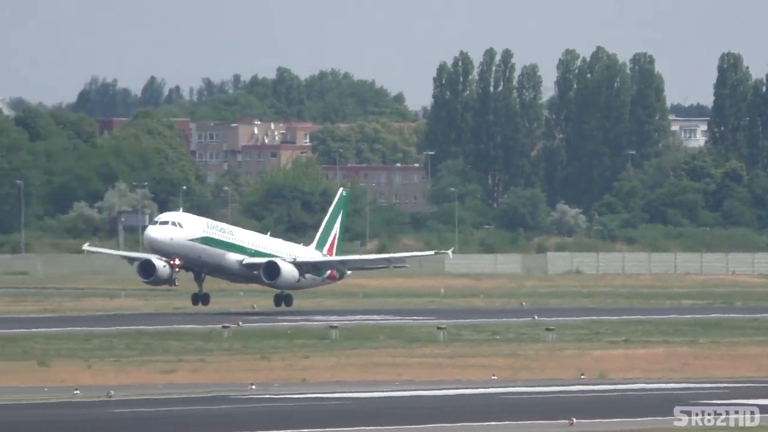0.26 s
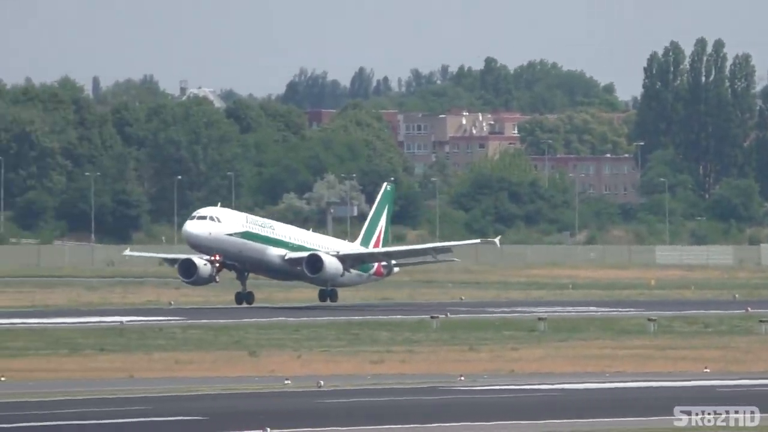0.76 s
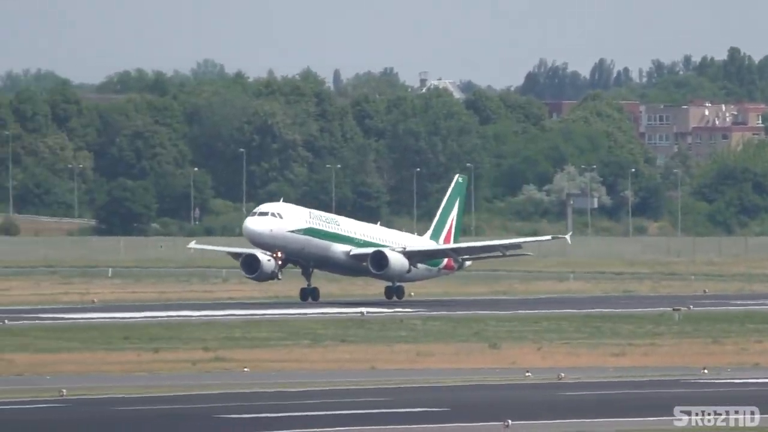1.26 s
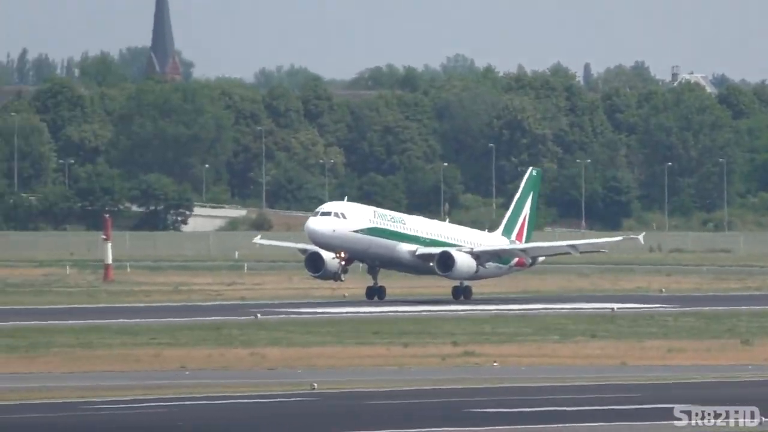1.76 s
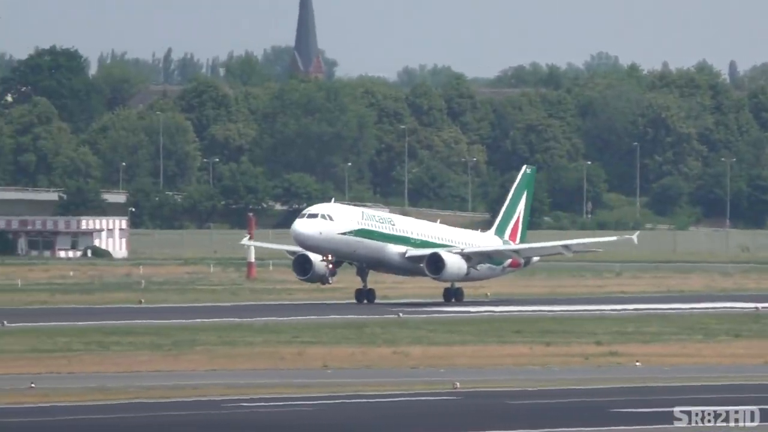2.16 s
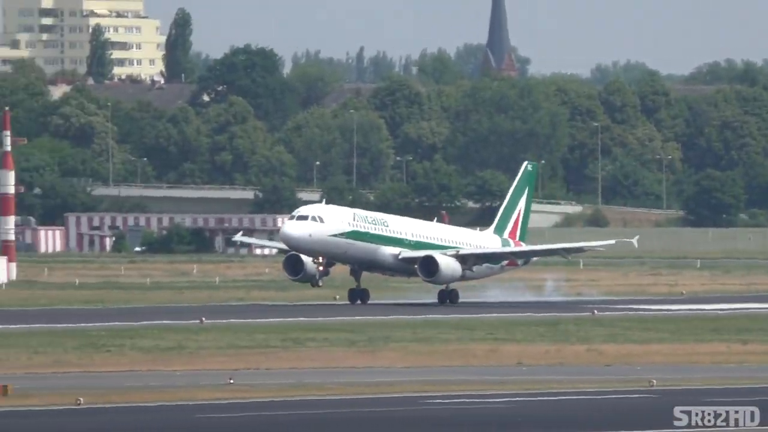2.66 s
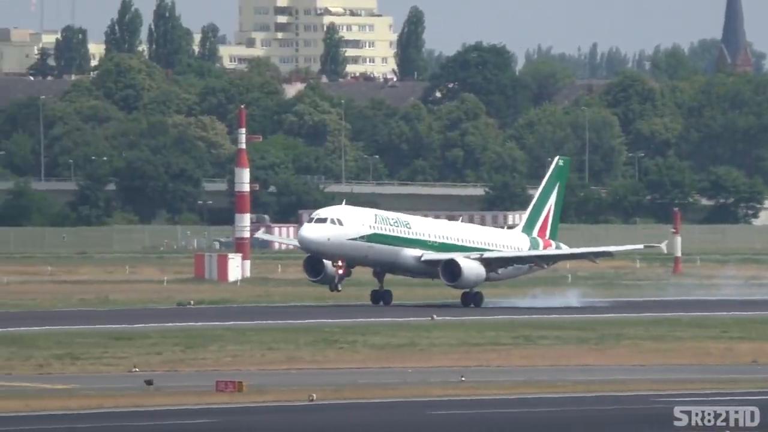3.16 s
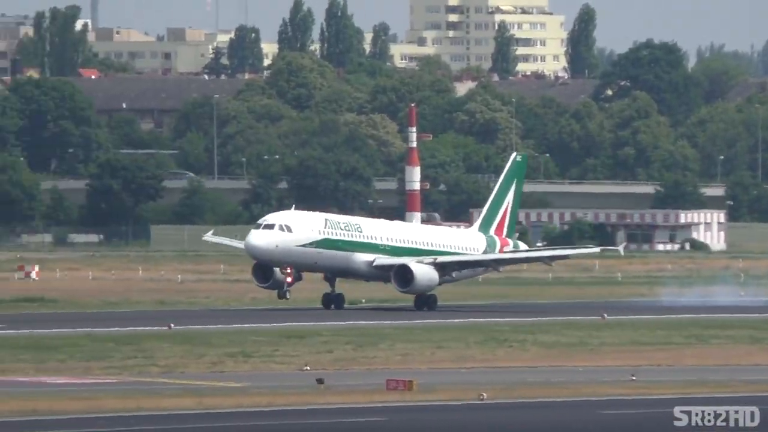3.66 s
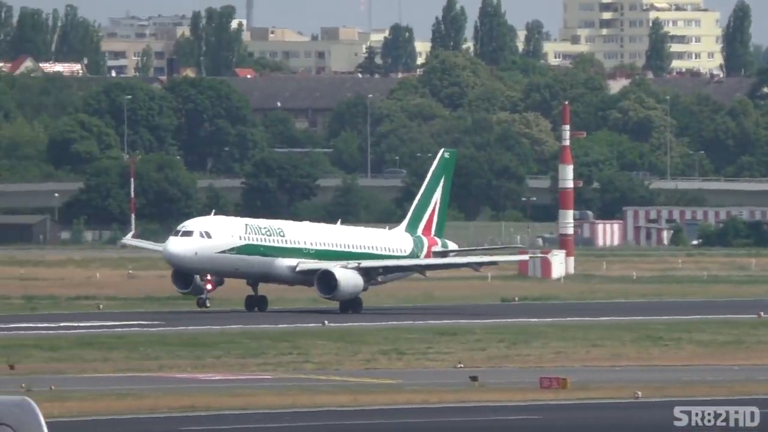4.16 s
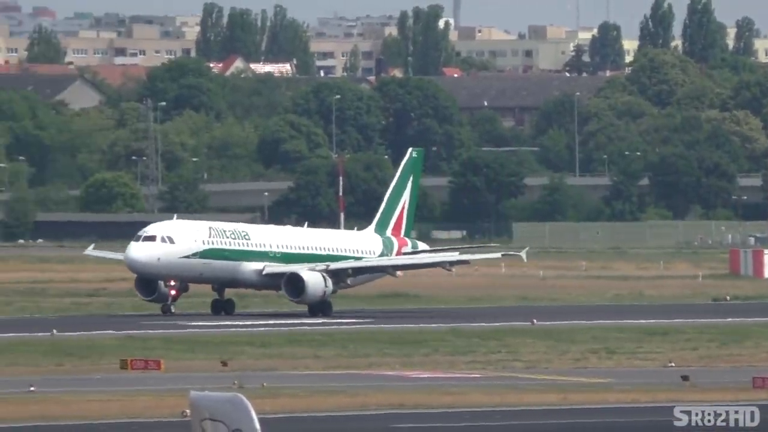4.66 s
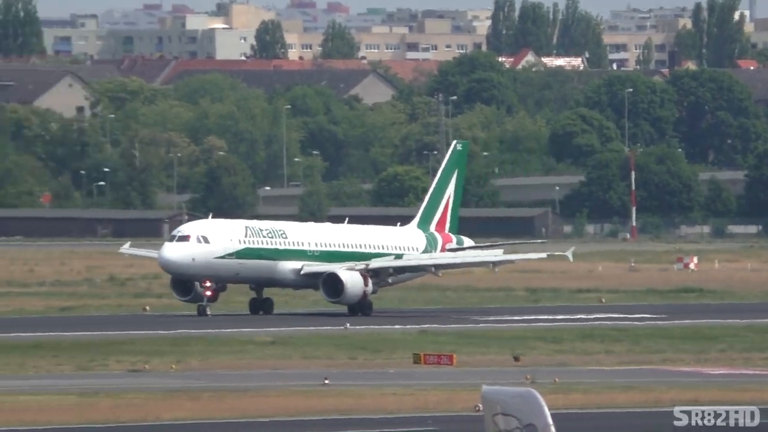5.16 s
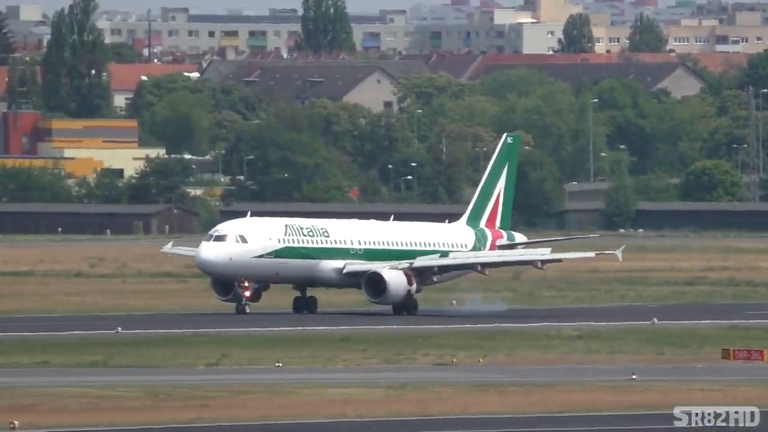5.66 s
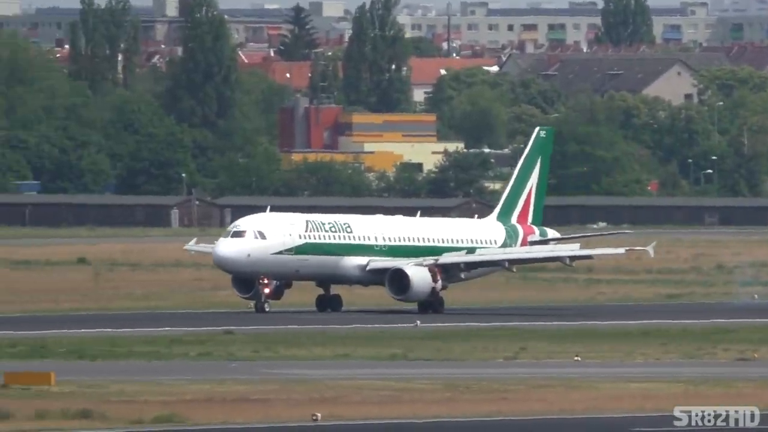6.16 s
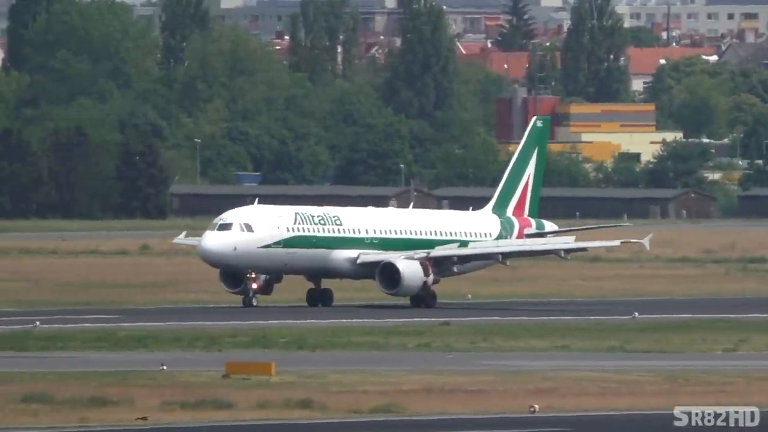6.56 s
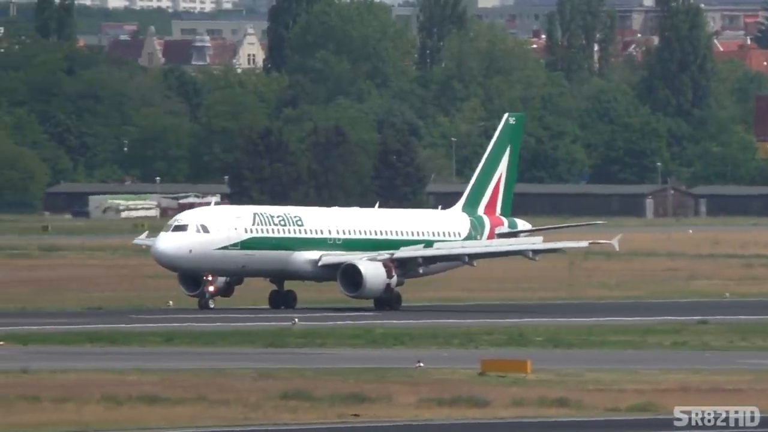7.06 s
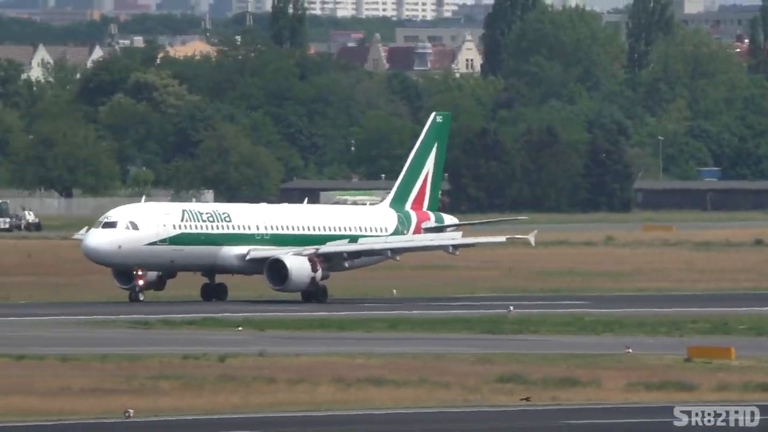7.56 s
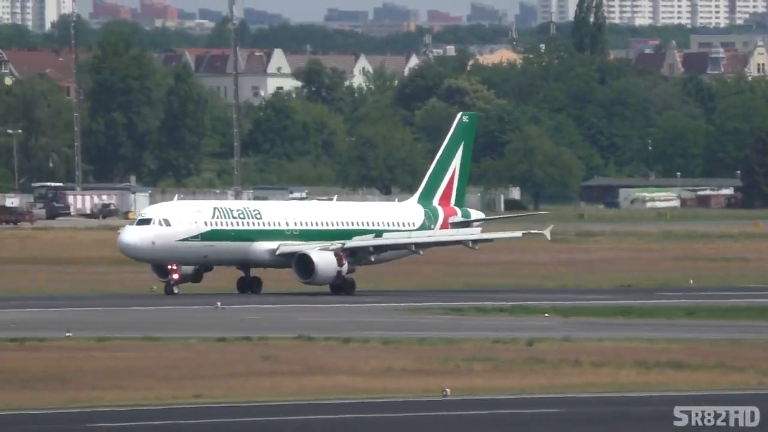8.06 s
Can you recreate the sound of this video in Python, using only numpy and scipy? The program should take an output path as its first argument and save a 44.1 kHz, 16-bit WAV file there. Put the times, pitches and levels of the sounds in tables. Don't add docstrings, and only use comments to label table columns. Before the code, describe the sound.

A twin-engine jet lands across a windy airfield: low gusty rumble, steady broad engine roar, faint high whines, and one short muffled tyre chirp.

```python
import sys
import numpy as np
from scipy import signal
from scipy.fft import rfft, irfft
from scipy.io import wavfile
from scipy.ndimage import uniform_filter1d

SR = 44100
rng = np.random.default_rng(int(sys.argv[2]) if len(sys.argv) > 2 else 0)


def gain_from_decibels(decibels):
    exponent = np.asarray(decibels, float) / 20
    return 10 ** exponent


def put_to_file(sound):
    columns = np.atleast_2d(sound).T
    safe = np.clip(columns, -1, 1)
    whole_steps = np.round(safe * 32767)
    wavfile.write(sys.argv[1], SR, whole_steps.astype(np.int16))


N = 366471

# (frequency [Hz], level [dB per Hz])
ROAR_SPECTRUM = [(110, -3), (200, -7), (320, -11), (500, -15.5), (900, -15.5), (1500, -20), (2300, -26),
                 (3300, -33.5), (4400, -45.5), (5000, -50), (7000, -50), (9000, -60), (10000, -70.5),
                 (12500, -68)]
# (level [dB], change [dB/s], share of carry [1], share of clearness [1])
ENGINE_REGIONS = [
    (-30.5, -0.33, 0.7, 0.05),
    (-37.5, -0.59, 0.66, 0.091),
    (-41.5, -0.23, 0.71, 0.05),
    (-48.5, -0.06, 1, 0.01),
    (-69, 0.05, 1, 0.95),
]
# (time [s], half length [s], low level [dB], upper level [dB])
EXHAUST_SURGES = [(0.35, 0.078, -1, -2), (1.1, 0.2, 1.5, 3.5), (1.65, 0.23, 2.0, 2), (2.9, 0.16, 1, -0.5),
                  (4.31, 0.13, 1, 1.5), (4.55, 0.14, 0, -0.2), (5.05, .1, 0.5, -0.5),
                  (6.288, 0.094, 1.5, 1.5), (6.65, 0.11, 1.5, 2.5), (7.147, 0.059, 3, 0.3),
                  (7.43, .1, 1, -0.5), (8.062, 0.23, 1.5, 0.1)]
# (time [s], carry [dB], clearness [dB])
AIR_PATH = [(0.0, -0.5, -1), (0.62, -0.3, -0.5), (1.1, -2, 1), (1.67, 1, -1), (2.4, 0.9, -1),
            (2.94, 1.4, -3.5), (3.3, -0.9, -2), (3.9, -0.1, -3.5), (4.22, 0.5, 4), (4.55, -1.7, -2.5),
            (5.05, 3, -2), (5.6, 1.5, 1.4), (6.0, 1.6, 3.5), (6.4, 4, 0), (6.7, -3, 1), (7.45, 0.5, -2.5),
            (7.75, 1.4, 0), (8.31, 4, 0)]

OVERTONE_HZ = [2720, 5447, 5512, 5520, 8178, 8270, 8230, 10920, 12890]
# (width [Hz], level against the fan hiss or air [dB])
OVERTONE_SHAPES = [(260, -8), (50, -20), (66, -22), (520, -15), (80, -13), (80, -12.5), (510, 3),
                   (410, -9.5), (200, -15)]

# (first
# frequency [Hz], last frequency [Hz])
WHINE_PITCHES = [(2719, 2726), (2751, 2761), (3888, 3888), (3874, 3876), (9243, 9265), (9354, 9384),
                 (806, 806), (915, 919), (8723, 8726), (3652, 3652), (13852, 13852), (1001, 1001)]
# (rms level [dB], change [dB/s])
LASTING_WHINES = [(-56.5, 0.3), (-61.5, 0.7), (-65.0, 0.2), (-69.0, 0.5), (-78.0, -0.1), (-82.5, 0.3),
                  (-50.5, -0.4), (-54.0, -1.1)]
# (rms level [dB], change [dB/s])
BRIEF_WHINES = [(-92.0, 0), (-82.0, 0), (-108.0, 0), (-75.0, 0)]
# (time [s], half length [s], lift [dB])
WHINE_FOCUS = [
    [(0.2, 0.17, 5.5), (1.5, 0.27, 3), (4.3, 0.22, 1.5), (5.4, 0.17, 1), (8.1, 0.33, 3)],
    [(0.85, 0.089, 9.0), (1.7, 0.14, 12), (5.09, 0.13, 10), (6.2, 0.3, 12.0), (7.79, 0.19, 6.0)],
    [(1.5, 0.18, 3), (6.0, 0.42, 3.5), (7.85, 0.27, 8.5)],
    [(2.07, 0.2, -2), (5.2, 0.51, 7)],
    [(5.3, 0.35, 6), (6.0, 0.18, 10), (8.2, 0.12, 16)],
    [(1.6, .25, 1), (5.94, .25, 6.0)],
    [(1.97, .3, 5.5), (5.3, 0.16, 6.0), (7.96, 0.29, 4.0)],
    [(1.0, .15, 11), (2.3, 0.62, 8.5), (4.3, 0.72, 6.5)],
    [(2.55, .3, 9)],
    [(2.3, .6, 14)],
    [(8.15, .22, 29.0)],
    [(7.02, .08, 34)],
]
WHINE_CARRY, WHINE_CLEARNESS = 0.52, 0.32

# (multiple [1], level [dB])
CHIRP_HARMONICS = [
    (1, -1),
    (2, 0),
    (3, -11),
]
CHIRP_S, CHIRP_DB, ATTACK_S, HOLD_S, RELEASE_S = 6.96, -36.0, .025, .12, .025
SLIP_HZ, SAG_HZ, SAG_MIDDLE_S, SAG_S = 310, 72, .1, .03

# (frequency [Hz], level [dB per Hz])
WIND_SPECTRUM = [(8.8, -32), (15, 2.5), (38, -0.5), (61, 7), (85, -1.5), (140, -18), (260, -24), (340, -52),
                 (570, -120)]
# (time [s], level [dB])
MEAN_WIND = [(0.0, -15.5), (0.76, -20), (1.51, -15), (2.27, -12.5), (3.02, -11), (3.78, -12.9),
             (4.53, -11.5), (5.29, -16.5), (6.04, -13.5), (6.8, -13.5), (7.55, -16), (8.31, -19.3)]
# (time [s], half length [s], slow buffet rise [dB], quick thump rise [dB])
WIND_GUSTS = [(0.11, 0.025, -8, 8.5), (0.34, 0.057, 5.5, 3), (0.77, 0.056, 5.5, -6), (1.166, 0.03, 6, 1.7),
              (1.472, 0.017, 0, 6.5), (2.066, 0.0088, 6.5, 2), (2.5, 0.088, 3, 0), (2.654, 0.024, 0.2, 4.6),
              (3.112, 0.077, -9, 2), (3.202, 0.011, 7, 8.3), (3.666, 0.017, 9, 4), (3.944, 0.02, 1, -2),
              (4.393, 0.14, 2, -3.6), (4.593, 0.087, -0.3, 1.5), (5.238, 0.03, 5.5, 4),
              (5.45, 0.027, 4, 9.5), (5.67, 0.056, 3.5, 4), (5.816, 0.023, 3.5, 6), (6.093, 0.03, 9, 5.5),
              (6.32, 0.017, 4.5, -9), (6.456, 0.059, -0.5, 0), (6.64, 0.061, 2.5, -1.5),
              (7.021, 0.018, -1, 7), (7.325, 0.06, 6, 5.3), (7.827, 0.051, 6, 7), (7.907, 0.014, -1, 1.5),
              (8.264, 0.022, 6, 8)]
# (time [s], half length [s], slow buffet fall [dB], quick thump fall [dB])
WIND_LULLS = [(0.01, 0.018, -2, 13), (0.54, 0.048, 0, 7.5), (0.63, 0.03, 0, -5), (0.95, 0.043, 6.9, 1),
              (1.09, 0.036, 1.5, 4), (1.31, 0.03, 0.5, 9), (1.59, 0.025, 7, -2.7), (1.82, 0.045, 18, -1),
              (2.34, 0.022, 12, 2.1), (2.8, 0.071, 2.5, 7), (3.29, 0.033, 2, 9.5), (4.03, 0.068, 1, 7),
              (4.75, 0.03, 5, 5.5), (4.98, 0.087, 5, -0.2), (5.12, 0.038, 0.8, 2), (5.59, 0.02, 3, -4),
              (6.12, 0.041, 11, 1.5), (6.19, 0.025, 0, 13), (6.51, 0.014, 6, 1), (6.79, 0.015, -0.9, 4),
              (6.92, 0.027, 8, 15), (7.2, 0.03, 2, 0), (7.46, 0.016, -0.5, -5), (7.58, 0.032, 2, 7.5),
              (7.72, 0.033, 0, -0.5), (8.06, 0.065, -1.4, 6.5), (8.16, 0.032, 5, 17)]
BUFFET_DB, THUMP_DB, FLUTTER_DB, FLUTTER_FOLLOWS = -3, -2.5, -10.5, 0.73
# (time [s], depth [dB], recovery [s])
GAIN_DUCKS = [(3.095, 3, .04), (3.21, 4, .05), (3.29, 2, .04), (3.66, 3, .06), (3.74, 3, .04),
              (5.48, 2, .04), (7.82, 1.5, .05), (6.282, 2.5, .02), (6.347, 8, .055), (6.447, 8, .06),
              (6.553, 6, .055), (6.622, 2.5, .04)]
SLAM_SHARE, SLAM_LEAD_S, SLAM_HALF_S = 1, 0.0014, 0.018

# (time [s], click rate [1/s])
BUZZ_STRETCHES = [
    (3.7448, 925),
    (3.7536, 1182),
    (3.7622, 914),
    (3.7710, 1172),
    (3.7795, 905),
    (3.7905, 905),
]
BUZZ_DB, BUZZ_SLOWING = -23, .0028
HISS_DB, HISS_FOLLOWS = -80, 0.9


def roar():
    levels_db = region_levels()
    edges = 125 * 2 ** np.arange(0, 6.7, 1 / 3)
    parts = bands(ROAR_SPECTRUM, edges, patchy_db=0.52, rate=3.34)
    region = np.searchsorted([600, 1200, 2600, 7000], edges[:-1] * 1.1)
    lifts_db = [2.0, 0.72, 0.77, 1.53, 0.43]
    out = np.zeros(N)
    for k, lift_db in enumerate(lifts_db):
        noise = rms_one(parts[region == k].sum(axis=0))
        out += gain_from_decibels(levels_db[k] + lift_db) * noise
    return out * gain_from_decibels(0.91 * drift(4.7))


def region_levels():
    t = np.arange(N) / SR
    carry_db, clear_db = in_time(AIR_PATH)
    low_db, upper_db = sum(np.outer(db, bump(s, half_s)) for s, half_s, *db in EXHAUST_SURGES)
    surges_db = [low_db, low_db, upper_db, 0.3 * upper_db, 0]
    levels_db = []
    for (db, slope, carry, clear), surge_db in zip(ENGINE_REGIONS, surges_db):
        levels_db.append(db + slope * t + carry * carry_db + clear * clear_db + surge_db)
    return levels_db


def smeared_overtones():
    *_, hiss_db, air_db = region_levels()
    out = np.zeros(N)
    for hz, (width_hz, level_db) in zip(OVERTONE_HZ, OVERTONE_SHAPES):
        r = np.exp(-np.pi * width_hz / SR)
        resonance = [1, 0, -1, 1, -2 * r * np.cos(2 * np.pi * hz / SR), r * r]
        ringing = rms_one(signal.sosfilt([resonance, resonance], rng.standard_normal(N)))
        fan_db = hiss_db if hz < 7000 else air_db
        out += gain_from_decibels(level_db + fan_db + 1.55 * drift(4.7)) * ringing
    return out


def whines():
    out, t = np.zeros(N), np.arange(N) / SR
    carry_db, clear_db = in_time(AIR_PATH)
    levels = LASTING_WHINES + BRIEF_WHINES
    for (first_hz, last_hz), (db, slope), moments in zip(WHINE_PITCHES, levels, WHINE_FOCUS):
        level_db = db + slope * t + WHINE_CARRY * carry_db + WHINE_CLEARNESS * clear_db
        level_db += sum(lift_db * bump(s, half_s) for s, half_s, lift_db in moments)
        hz = np.linspace(first_hz, last_hz, N) * (1 + .0006 * drift(6))
        twinkle_db = 2.2 * drift(12) - .8
        tone = np.sin(2 * np.pi * np.cumsum(hz) / SR)
        out += np.sqrt(2) * gain_from_decibels(level_db + twinkle_db) * tone
    return out


def tyre_chirp():
    hz, gain = chirp_shape()
    phase = 2 * np.pi * np.cumsum(hz * (1 + 0.009 * drift(36))) / SR
    tone = sum(gain_from_decibels(db) * np.sin(multiple * phase) for multiple, db in CHIRP_HARMONICS)
    return np.sqrt(2) * gain * tone


def tyre_scuff():
    band = signal.butter(2, [450, 1100], "band", fs=SR, output="sos")
    scuff = signal.sosfilt(band, rng.standard_normal(N))
    return gain_from_decibels(-6) * chirp_shape()[1] * rms_one(scuff)


def chirp_shape():
    since = np.arange(N) / SR - CHIRP_S
    left = ATTACK_S + HOLD_S + RELEASE_S - since
    gain = np.clip(np.minimum(since / ATTACK_S, left / RELEASE_S), 0, 1)
    sag = (1 + np.tanh((since - SAG_MIDDLE_S) / SAG_S / 2)) / 2
    return SLIP_HZ - SAG_HZ * sag, gain_from_decibels(CHIRP_DB) * gain ** 2


def wind(gain):
    parts = bands(WIND_SPECTRUM, 16 * 2 ** np.arange(0, 4.1, .5), patchy_db=1.2, rate=6)
    slam_db = sum(SLAM_SHARE * depth_db * bump(s - SLAM_LEAD_S, SLAM_HALF_S)
                  for s, depth_db, _ in GAIN_DUCKS)
    slow_db, quick_db = gusting() + slam_db
    buffet = evened(rms_one(parts[:3].sum(axis=0)), span_s=0.086, share=0.79)
    thump = evened(rms_one(parts[3:5].sum(axis=0)), span_s=0.093, share=0.95)
    flutter = evened(rms_one(parts[5:].sum(axis=0)), span_s=0.13, share=0.4)
    eddies = gain_from_decibels(BUFFET_DB + slow_db) * buffet
    eddies += gain_from_decibels(THUMP_DB + quick_db) * thump
    eddies += gain_from_decibels(FLUTTER_DB + FLUTTER_FOLLOWS * quick_db) * flutter * gain ** 0.82
    return gain_from_decibels(in_time(MEAN_WIND)[0] + 1.03 * drift(22) + 0.2) * eddies


def gusting():
    rises = sum(np.outer(db, bump(s, half_s)) for s, half_s, *db in WIND_GUSTS)
    falls = sum(np.outer(db, bump(s, half_s)) for s, half_s, *db in WIND_LULLS)
    return rises - falls


def ducking():
    t, drop_db = np.arange(N) / SR, np.zeros(N)
    for s, depth_db, recovery_s in GAIN_DUCKS:
        since = np.clip(t - s, 0, None)
        onset = 1 - np.exp(-since / .004)
        drop_db += depth_db * onset * np.exp(-(since / recovery_s) ** 3)
    return gain_from_decibels(-drop_db)


def buzz():
    out = np.zeros(N)
    start, end = BUZZ_STRETCHES[0][0], BUZZ_STRETCHES[-1][0]
    frame = np.arange(int(start * SR), int(end * SR))
    for (s, per_s), (until, _) in zip(BUZZ_STRETCHES, BUZZ_STRETCHES[1:]):
        k = np.arange(round((until - s) * per_s))
        times = s + k / per_s * (1 + BUZZ_SLOWING * k / 2)
        swell = (1 - abs(2 * (times - start) / (end - start) - 1)) ** 1.3
        out[frame] += np.sinc(frame[:, None] - times * SR) @ swell
    return gain_from_decibels(BUZZ_DB) * signal.sosfilt(signal.butter(1, 2500, "high", fs=SR, output="sos"), out)


def hiss():
    treble = signal.butter(2, 10000, "high", fs=SR, output="sos")
    white = signal.sosfilt(treble, rng.standard_normal(N))
    return gain_from_decibels(HISS_DB + HISS_FOLLOWS * in_time(AIR_PATH)[0] + 12.0) * white


def bands(spectrum, edges, patchy_db, rate):
    hz, level_db = np.transpose(spectrum)
    white = rng.standard_normal((2, N + SR))
    out = []
    for k, (low, high) in enumerate(zip(edges, edges[1:])):
        band_filter = signal.butter(2, [low, high], "band", fs=SR, output="sos")
        band = signal.sosfilt(band_filter, white[k % 2])[SR:]
        band_db = np.interp(np.log(low * high) / 2, np.log(hz), level_db)
        out.append(band * gain_from_decibels(band_db + patchy_db * drift(rate)))
    return np.array(out)


def evened(x, span_s, share):
    swell = np.sqrt(uniform_filter1d(x ** 2, int(span_s * SR)) + 1e-9)
    return rms_one(x / swell ** np.clip(share, 0, 1))


def drift(rate):
    r = np.exp(-80 * np.pi * rate / SR)
    slow = signal.lfilter([1], [1, -2 * r, r * r], rng.standard_normal(N // 40 + 2002))[2000:]
    return np.interp(np.arange(N) / 40, np.arange(len(slow)), rms_one(slow))


def bump(s, half_s):
    out, reach = np.zeros(N), int(4 * half_s * SR)
    k = np.arange(max(int(s * SR) - reach, 0), min(int(s * SR) + reach, N))
    out[k] = np.exp(-.5 * ((k / SR - s) / half_s) ** 2)
    return out


def in_time(rows):
    s, *columns = np.transpose(rows)
    return [np.interp(np.arange(N) / SR, s, c) for c in columns]


def rms_one(x):
    return x / np.sqrt(np.mean(x ** 2) + 1e-20)


def scene():
    gain = ducking()
    far = roar() + smeared_overtones() + whines() + tyre_chirp()
    mix = (far + hiss()) * gain + wind(gain) + buzz() + tyre_scuff()
    return mix[None, :]


def band_limit(x):
    return signal.sosfilt(signal.butter(12, 16080, fs=SR, output="sos"), x)


def record(dry):
    spectrum = rfft(np.tanh(dry))
    spectrum[:, int(15735 * N / SR):] = 0
    return band_limit(irfft(spectrum, N))


dry = scene()
out = record(dry)
put_to_file(out)
```